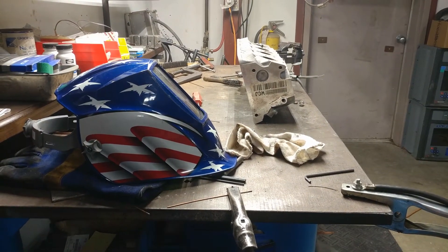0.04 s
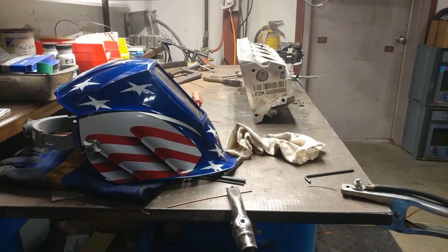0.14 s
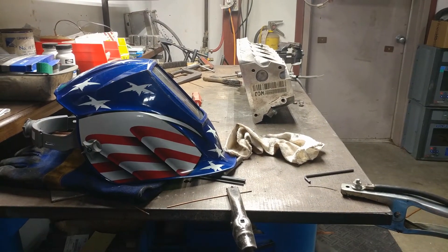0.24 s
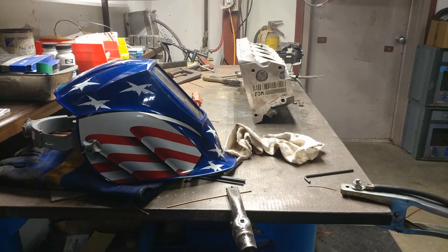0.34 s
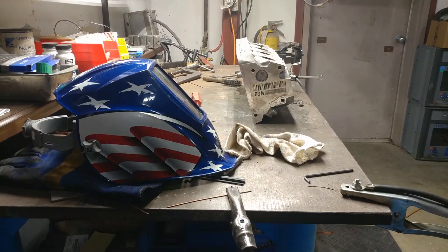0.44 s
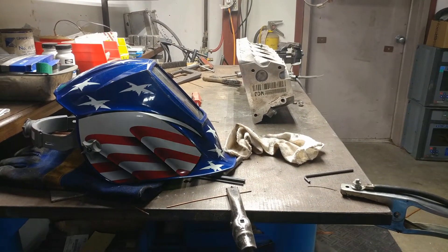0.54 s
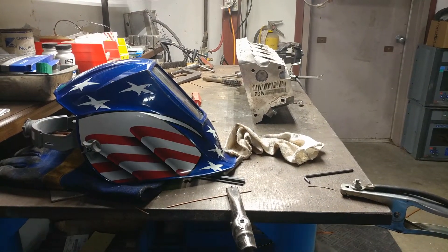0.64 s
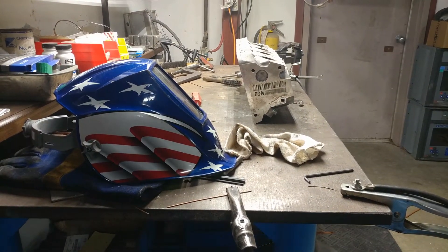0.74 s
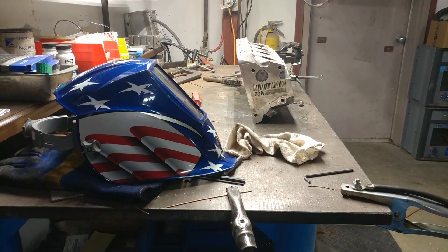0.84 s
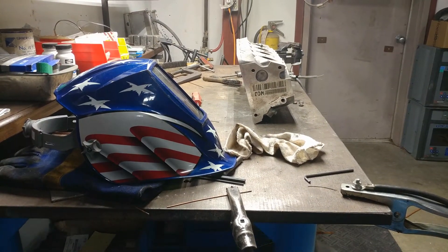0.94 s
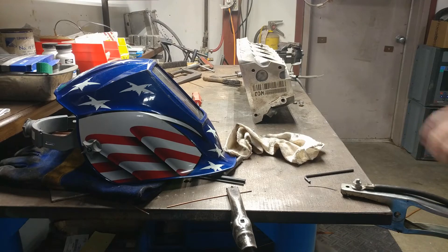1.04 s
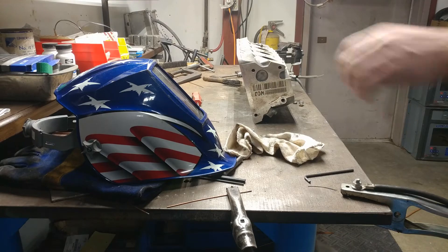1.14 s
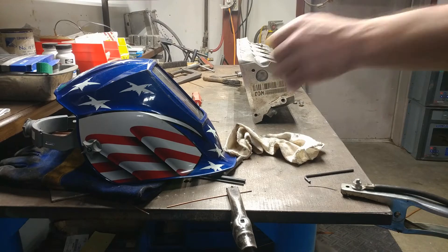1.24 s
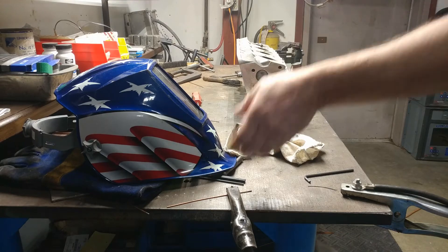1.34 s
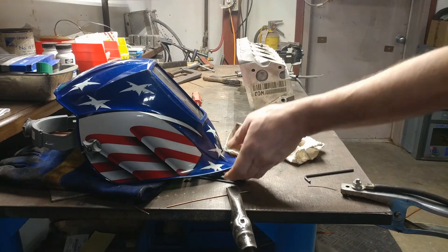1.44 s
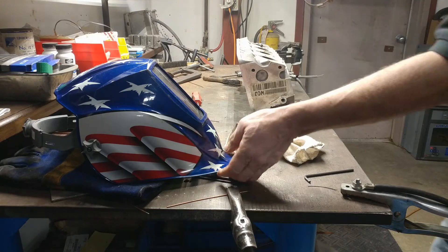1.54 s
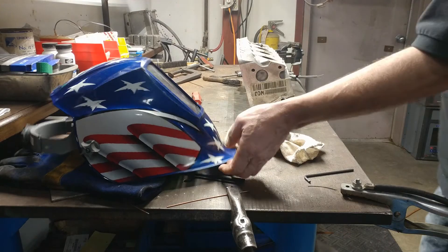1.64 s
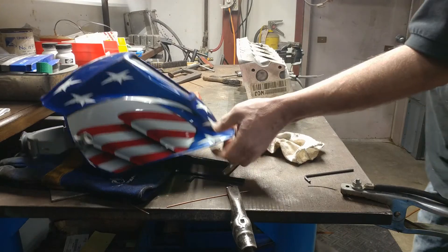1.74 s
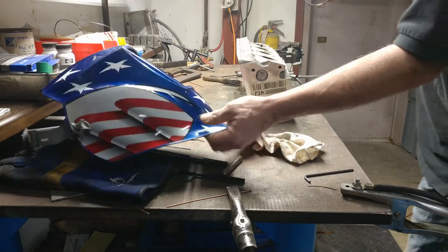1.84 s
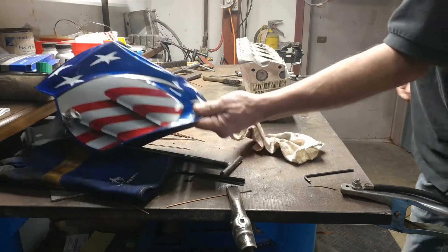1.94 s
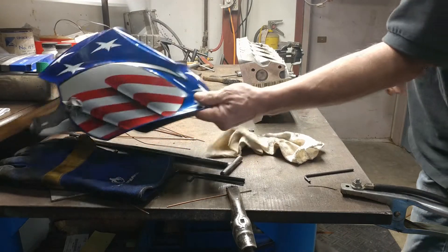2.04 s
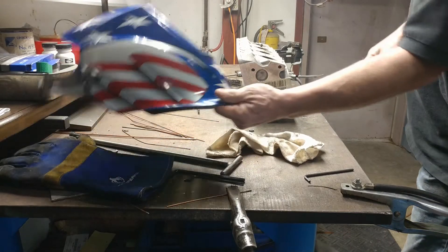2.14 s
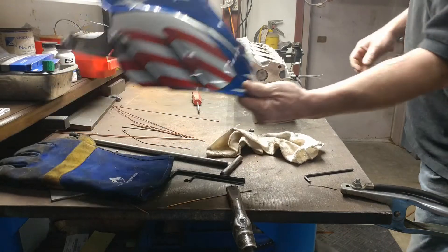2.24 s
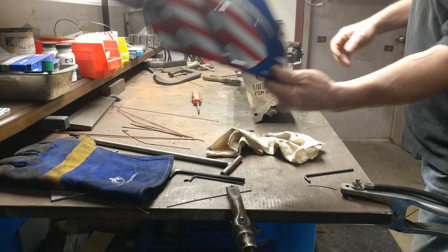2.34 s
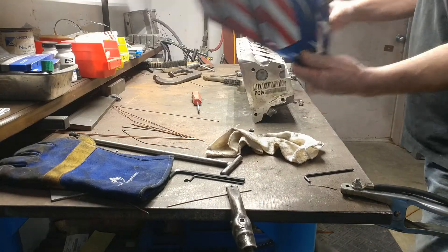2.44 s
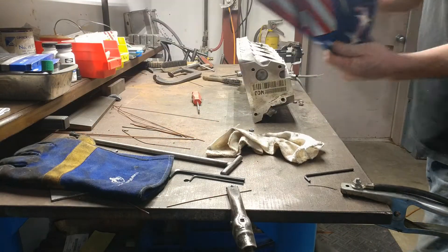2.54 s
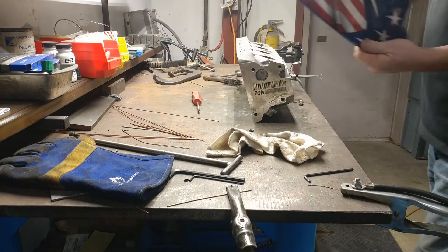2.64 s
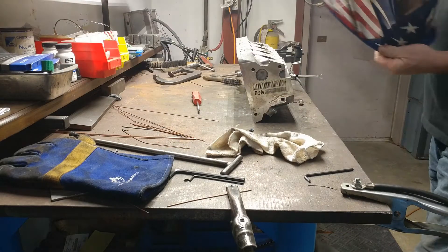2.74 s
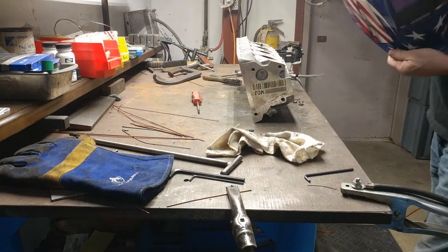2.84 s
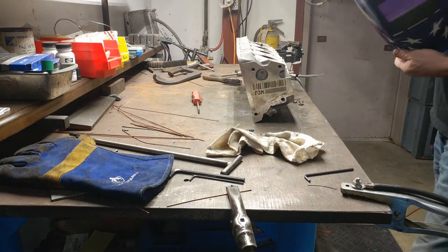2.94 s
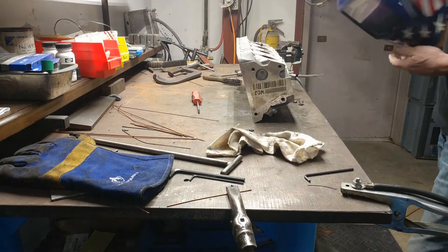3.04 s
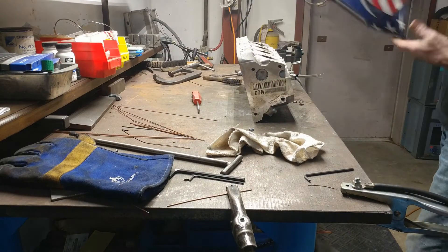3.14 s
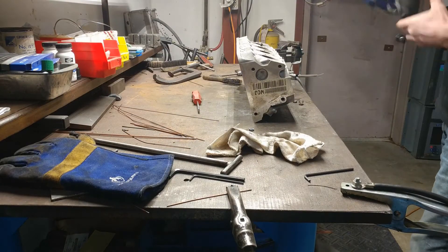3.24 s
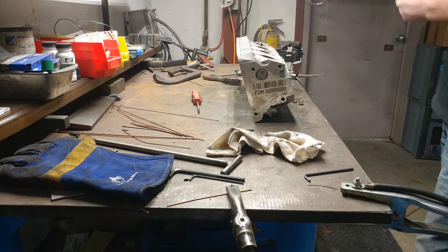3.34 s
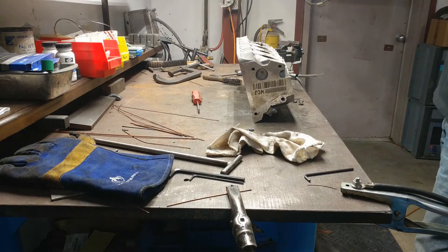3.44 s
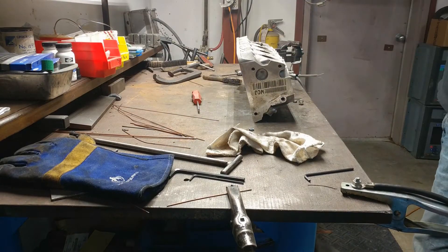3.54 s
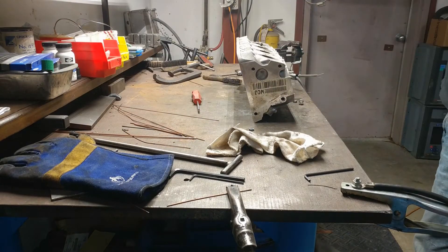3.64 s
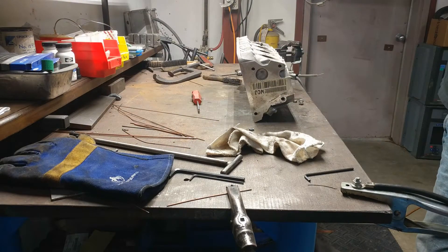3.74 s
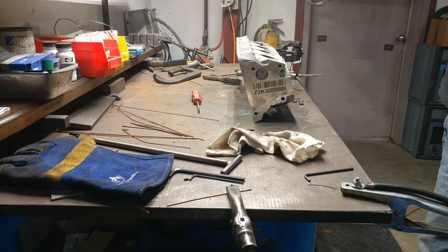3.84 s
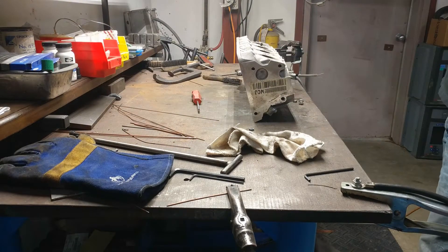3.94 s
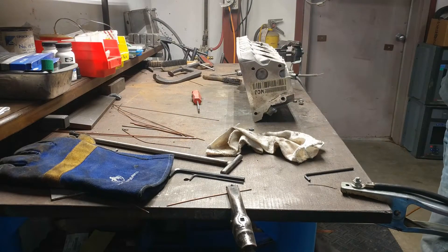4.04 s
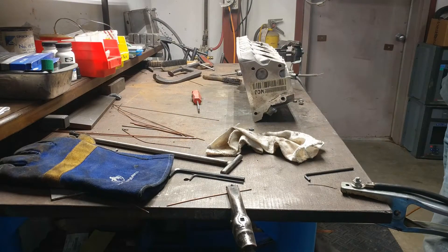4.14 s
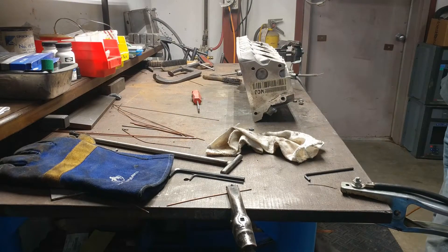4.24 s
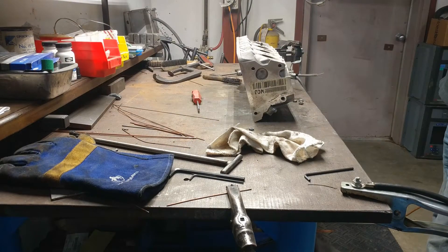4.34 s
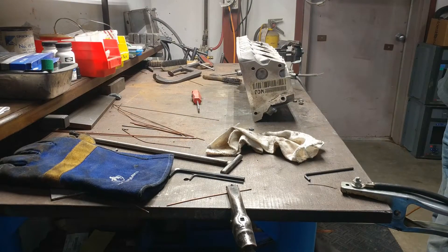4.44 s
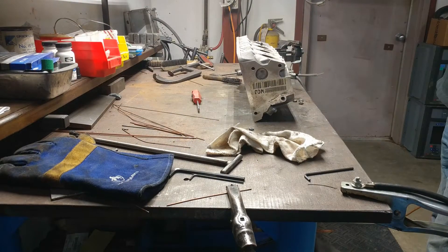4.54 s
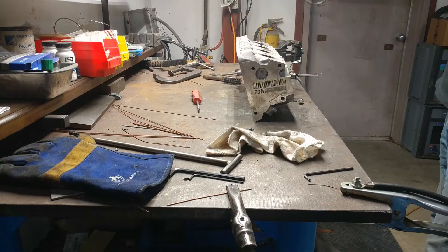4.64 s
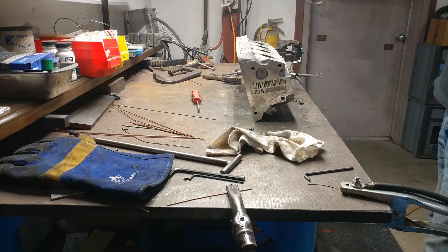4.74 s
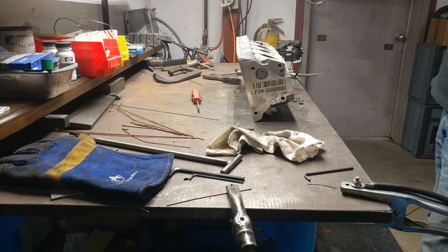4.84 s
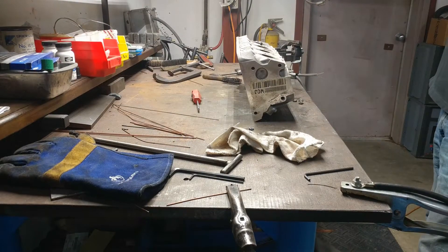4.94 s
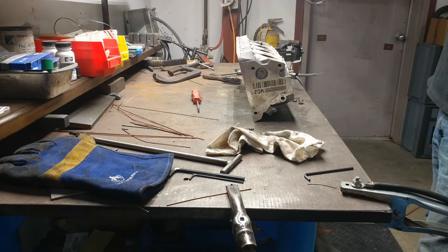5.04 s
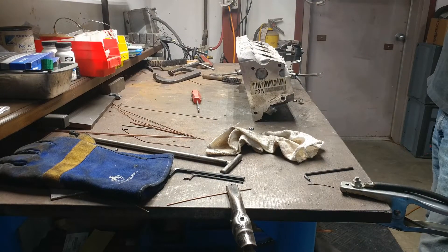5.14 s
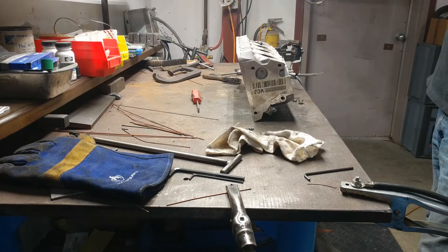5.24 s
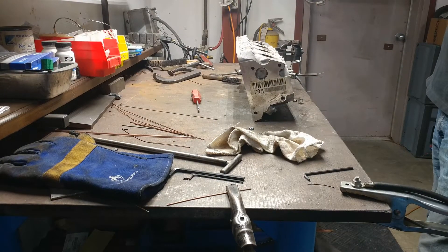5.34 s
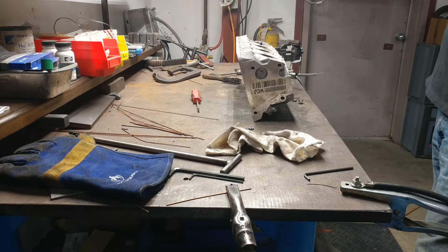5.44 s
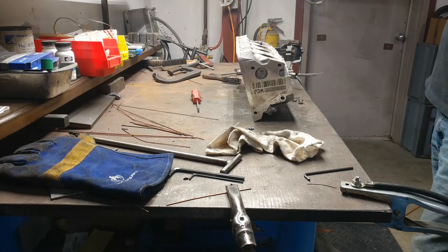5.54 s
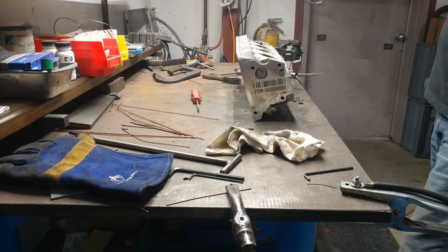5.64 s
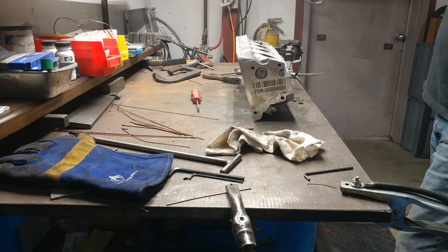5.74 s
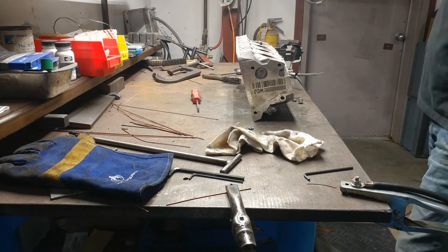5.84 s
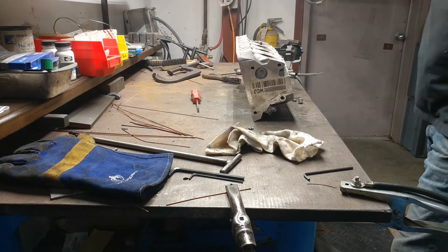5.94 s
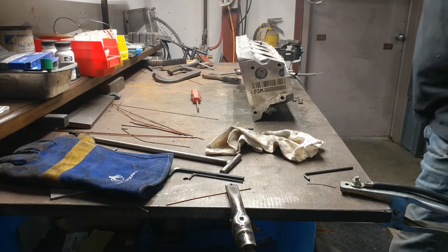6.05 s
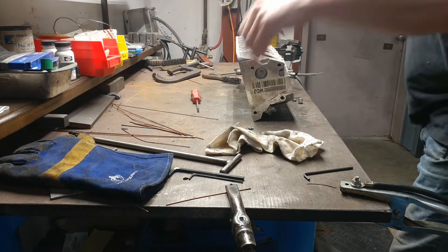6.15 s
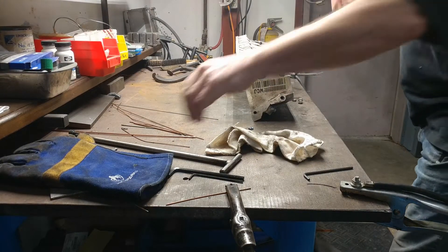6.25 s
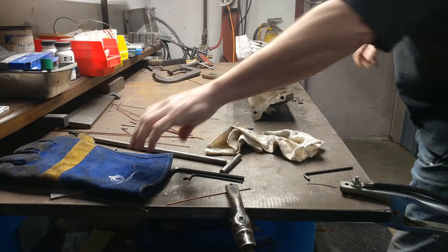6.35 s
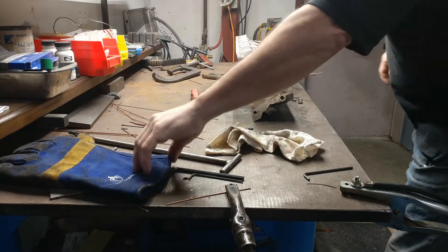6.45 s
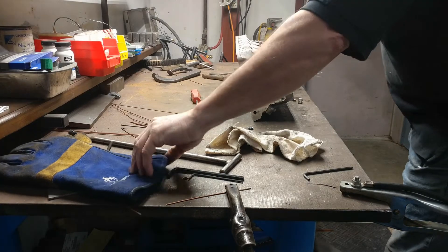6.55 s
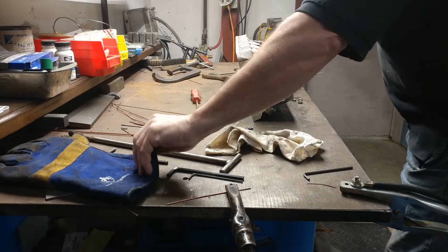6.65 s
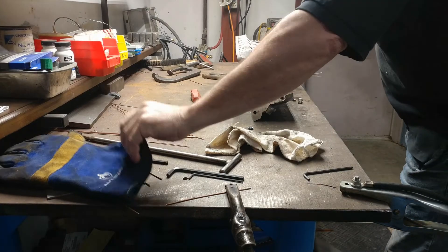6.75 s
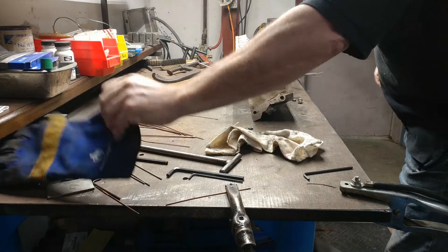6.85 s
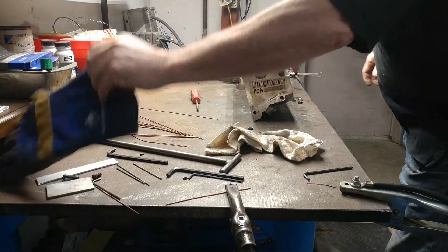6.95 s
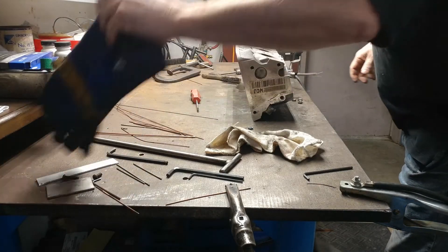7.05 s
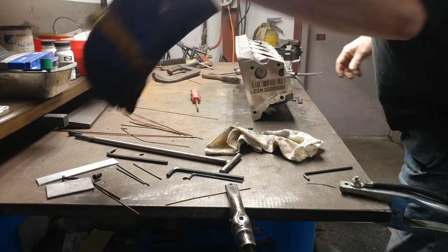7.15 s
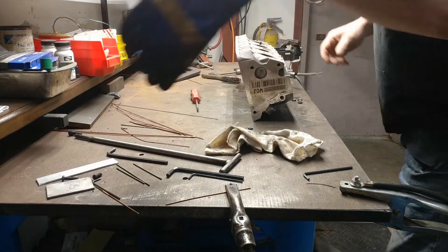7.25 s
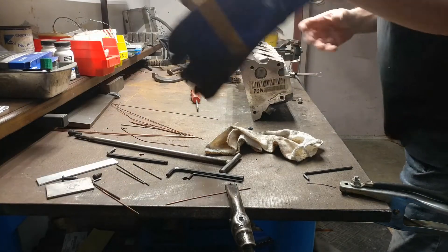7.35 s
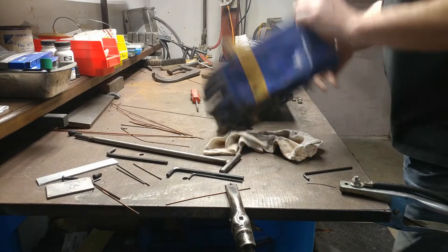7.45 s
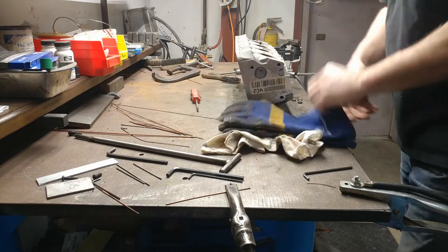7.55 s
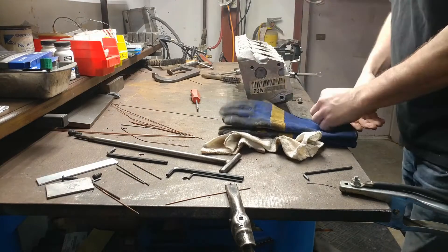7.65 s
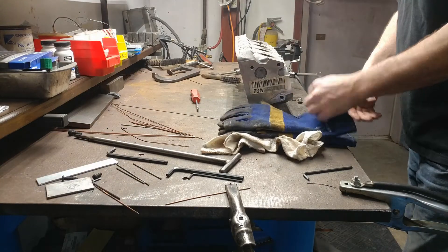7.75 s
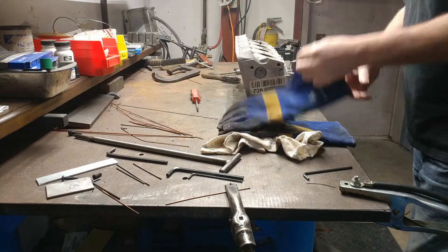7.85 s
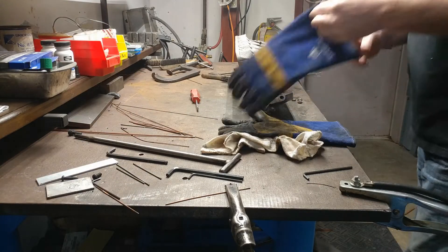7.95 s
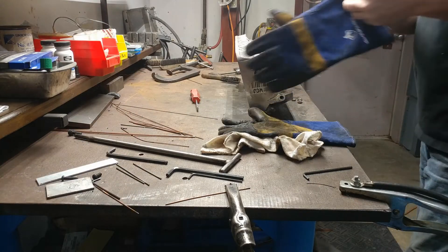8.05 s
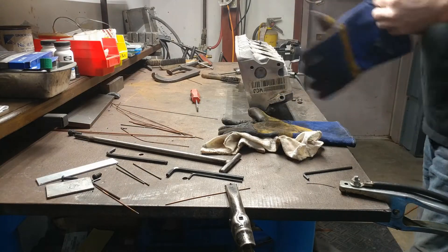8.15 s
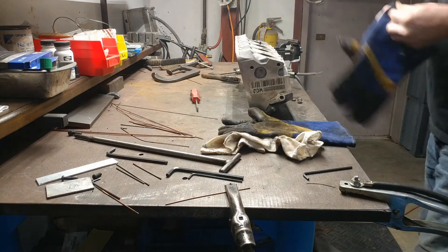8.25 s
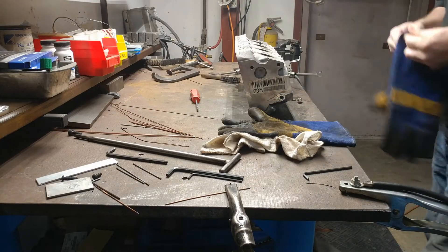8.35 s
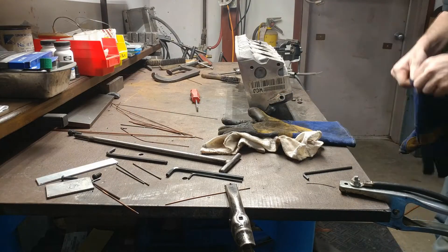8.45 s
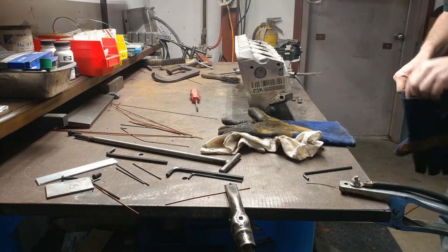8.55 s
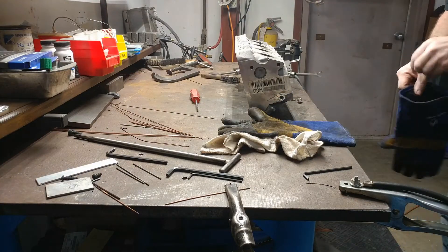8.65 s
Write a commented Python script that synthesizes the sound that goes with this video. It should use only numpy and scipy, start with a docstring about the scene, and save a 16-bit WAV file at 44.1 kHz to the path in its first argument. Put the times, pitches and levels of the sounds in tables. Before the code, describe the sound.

A hollow plastic welding helmet is lifted and knocked about in a small humming workshop, then leather gloves scrape over steel tools and slap down.

```python
"""A plastic welding helmet is lifted off a steel bench, handled and put on in a quiet workshop: bursts of
contacts excite its hollow, shell and rim, and its straps rub as uneven noise. Leather gloves slap the bench
and drag over steel tools, which ring as decaying sines and sing under the leather. Sleeves swish as
coloured hiss, a mains transformer hums over rumble and air, and a small camera's electronics chirp faintly
in the far treble."""
import sys
import numpy as np
from scipy import signal
from scipy.fft import rfft, irfft, next_fast_len
from scipy.io import wavfile
from scipy.ndimage import uniform_filter1d, map_coordinates

SR = 44100
rng = np.random.default_rng(int(sys.argv[2]) if len(sys.argv) > 2 else 0)


def wrap_up_sound(samples):
    """Save the sound to the file named by the first command line argument, as 16-bit audio."""
    columns = np.atleast_2d(samples).T
    # keep every value between -1 and 1, then stretch to whole-number steps
    tamed = np.clip(columns, -1, 1)
    steps = np.round(tamed * 32767).astype(np.int16)
    wavfile.write(sys.argv[1], SR, steps)


N = 384195


def amp(db):
    """Decibels to gain."""
    return 10 ** (np.asarray(db) / 20)


def unit(x):
    """Scale to an rms of 1."""
    return x / np.sqrt(np.mean(x ** 2) + 1e-20)


def along(points, hz):
    """Read a curve of (pitch_hz, value) points on a log pitch axis."""
    f, v = np.transpose(points)
    return np.interp(np.log(hz + 1), np.log(f + 1), v)


def curves(rows):
    """Draw one automation curve for each column after the time."""
    s, *columns = np.transpose(rows)
    return [np.interp(np.arange(N) / SR, s, column) for column in columns]


def wobble(rate):
    """A smooth random curve with `rate` knots a second."""
    knots = rng.standard_normal(int(N * rate / SR) + 4)
    return map_coordinates(knots, [np.arange(N) * rate / SR])


def filtered(x, response):
    """Shape x by a complex response of frequency."""
    m = next_fast_len(N + SR // 2)
    return irfft(rfft(x, m) * response(np.fft.rfftfreq(m, 1 / SR)), m)[..., :N]


def hiss(spectrum):
    """Coloured noise with an rms of 1."""
    return unit(filtered(rng.standard_normal(N), lambda hz: amp(along(spectrum, hz))))


def bandpass(f, centre_hz, width_hz):
    """One resonance with a gain of 1 at its centre."""
    return 1j * f * width_hz / (centre_hz ** 2 - f ** 2 + 1j * f * width_hz)


def body(f, modes, softness, favoured_hz=None, fall_db=0):
    """Resonances fade by fall_db an octave away from favoured_hz; a softer contact rolls off the treble."""
    response = 0
    for k, (pitch_hz, width_hz, level_db) in enumerate(modes):
        lean_db = fall_db * abs(np.log2(pitch_hz / favoured_hz)) if favoured_hz else 0
        response = response + (-1) ** k * amp(level_db - lean_db) * bandpass(f, pitch_hz, width_hz)
    response = response * 1j * f / (modes[0][0] + 1j * f)  # thin out below the first mode
    response = response / (1 + 1j * f / min(modes[-1][0], 4000)) ** softness  # from the last mode or 4 kHz
    return response / np.sqrt(np.mean(abs(response) ** 2))


def through(x, modes, softness):
    """Play x through resonances; white noise keeps its power."""
    return filtered(x, lambda f: body(f, modes, softness))


STROKE_DROP_DB = 20  # how far a stroke is under its peak one rise or fall away


def strokes(table):
    """Strokes swell, hold and fade in dB; their powers add, in the body and in the bright edge."""
    t, power = np.arange(N) / SR, np.zeros((2, N))
    for full_s, rise_s, hold_s, fall_s, level_db, bright_db in table:
        end_s = full_s + hold_s
        span = slice(max(int((full_s - 3 * rise_s) * SR), 0), int((end_s + 3 * fall_s) * SR))
        away = np.maximum((full_s - t[span]) / rise_s, (t[span] - end_s) / fall_s)
        stroke_db = level_db - STROKE_DROP_DB * np.maximum(away, 0)
        power[:, span] += amp(2 * (stroke_db + np.array([[0], [bright_db]])))
    return np.sqrt(power)


def friction(table, low, mid, high, grit_db, low_db, pad, softness):
    """Uneven stick-slip noise under the strokes shakes the low, mid and high resonances."""
    level, bright = strokes(table)
    grit = amp(grit_db * wobble(90) + grit_db * wobble(400))
    dull, middle, edge = [unit(grit * rng.standard_normal(N)) for _ in range(3)]
    rub = amp(low_db) * through(dull, low, 1.4) + through(middle, mid, pad)
    return level * rub + bright * through(edge, high, softness)


def contacts(t, t60, shape, onset_s, rattle_db, spike, edge):
    """The force of one blow on thud, knock and crack: a sharp push, then a scatter of contacts that dies."""
    crack_fade_db = 11  # extra loss of the crack over one t60
    size = len(t)
    force = rng.standard_normal((3, size)) * amp(3.74 * rng.standard_normal(size))  # contacts differ in size
    clumps = unit(uniform_filter1d(rng.standard_normal(size), size=110))
    force *= unit(amp(rattle_db * np.tanh(t / 0.018) * clumps))
    force *= amp(-60 * (t / t60) ** shape) * (1 - np.exp(-t / onset_s))
    force[2] *= amp(-crack_fade_db * t / t60)
    force[:, 0] = spike, spike, spike * edge
    return force


# thin-wall modes that colour the crack: pitch_hz
THIN_WALL_HZ = [2030, 2330, 2920, 3110, 3800, 4500, 4650]
THIN_WALL_Q = 28  # pitch over width


def crack_colour(f, thin, crack_hz):
    """Thin-wall modes answer at random strengths, over a broad peak at each crack pitch."""
    flex = 1
    for c in THIN_WALL_HZ:
        flex = flex + thin * rng.uniform(0, 2) * bandpass(f, c, c / THIN_WALL_Q)
    for c in crack_hz:
        flex = flex * (0.48 + 1.6 * bandpass(f, c, c / 3.74))
    return flex


def blows(table, low, mid, high, spike, pad, dull, shape, fall_db, thin, edge, onset_s, rattle_db, layers):
    """Each blow drives thud, knock and crack; where it lands decides which mid modes answer."""
    size = 8192
    out, t, f = np.zeros(N + size), np.arange(size) / SR, np.fft.rfftfreq(size, 1 / SR)
    for start_s, level_db, thud_db, crack_db, t60, mid_hz, *crack_hz in table:
        force = contacts(t, t60, shape, onset_s, rattle_db, spike, edge)
        softness = dull - 0.059 * min(crack_db, -8)  # a blow with a weak crack is also a dull one
        thud_body = amp(thud_db) * body(f, low, 2.25)
        knock_body = body(f, mid, pad, mid_hz, fall_db) ** layers
        crack_body = amp(crack_db) * crack_colour(f, thin, crack_hz) * body(f, high, softness)
        thud, knock, crack = irfft(rfft(force) * [thud_body, knock_body, crack_body])
        out[round(start_s * SR):][:size] += amp(level_db) * (thud + knock + crack) / abs(knock).max()
    return out[:N]


# hum and rumble levels: time_s, hum_db, rumble_db
BED_LEVELS = [(0, -40, -45.5), (.95, -41.5, -47), (1.55, -38, -46.5), (1.9, -37.5, -45), (2.6, -38.5, -48),
              (4.2, -41, -52), (5.15, -39, -51), (5.45, -41.5, -52), (6.2, -42, -53), (6.7, -39.5, -49),
              (7.4, -40.5, -51.5), (8.71, -41, -46)]
# hum overtones: multiple, level_db (re hum)
HUM_OVERTONES = [(2, -20), (3, -19), (4, -22), (5, -29)]
# spectrum of the building's rumble: pitch_hz, density_db (per Hz, relative)
RUMBLE_SPECTRUM = [(15, -5), (28, 7), (60, -4), (110, 0), (200, -17.5), (300, -46.5)]
# spectrum of the room air: pitch_hz, density_db (per Hz, relative)
AIR_SPECTRUM = [(70, -13), (130, -10.5), (240, -14.5), (330, -24.5), (600, -26), (1140, -30.5),
                (1600, -36.5), (2900, -40.5), (6000, -44.5), (9000, -53.5), (15800, -48)]
HUM_HZ = 119.6  # twice the mains frequency


def background():
    """Transformer hum with wavering overtones as sines, building rumble and room air as coloured noise."""
    hum_db, rumble_db = curves(BED_LEVELS)
    phase = 2 * np.pi * HUM_HZ * np.arange(N) / SR
    hum = np.sin(phase + 0.56 * wobble(18.0)) * amp(0.9 * wobble(17))
    for multiple, level_db in HUM_OVERTONES:
        drift = rng.uniform(0, 2 * np.pi) + 0.7 * wobble(12)
        hum = hum + amp(level_db + 2.3 * wobble(6.2)) * np.sin(multiple * phase + drift)
    air = amp(-51) * hiss(AIR_SPECTRUM)
    return np.sqrt(2) * amp(hum_db) * hum + amp(rumble_db) * hiss(RUMBLE_SPECTRUM) + air


# tones of the long blip: pitch_hz, level_db (while on)
LONG_BLIP = [(12360, -77), (12712, -73), (13070, -69)]
# tones of the short blip: pitch_hz, level_db (while on)
SHORT_BLIP = [(12480, -74), (12800, -78), (13170, -70)]
# tones of the closing blip: pitch_hz, level_db (while on)
CLOSING_BLIP = [(14020, -73), (14670, -70)]
# steady thin tone: pitch_hz, level_db
THIN_TONE = [(5512, -78)]


def electronics():
    """About 30 uneven cycles a second gate sines: a long blip, a short one and a higher closing one."""
    t = np.arange(N) / SR
    starts = np.cumsum(0.026 + rng.gamma(2, .004, size=400))
    since = t - np.append(-1, starts)[np.searchsorted(starts, t)]
    waver = 0.4 * wobble(45)

    def gate(on_s, off_s):
        """Open for part of each cycle, with softened edges."""
        return uniform_filter1d(((since > on_s) & (since < off_s)) * 1., size=70)

    def tones(lines):
        """Sines that waver in phase together."""
        return sum(amp(level_db) * np.sin(2 * np.pi * hz * t + waver) for hz, level_db in lines)

    blips = gate(0, .011) * tones(LONG_BLIP) + gate(.0135, .018) * tones(SHORT_BLIP)
    return blips + gate(.0185, .026) * tones(CLOSING_BLIP) + tones(THIN_TONE)


# decay of the workshop: pitch_hz, t60_s
ROOM_DECAY = [(150, 0.31), (1000, 0.1), (8000, 0.14)]


def shop(x):
    """The room answers as a noise tail in which each frequency dies at its own speed."""
    hz, t, grains = signal.stft(rng.standard_normal(SR // 2), SR, nperseg=256)
    decay = amp(-60 * t / along(ROOM_DECAY, hz)[:, None])
    tail = signal.istft(grains * decay, SR, nperseg=256)[1]
    delayed = np.pad(x, (300, 0))  # samples before the room answers
    return signal.fftconvolve(delayed, tail / np.linalg.norm(tail))[:N]


# colour of the camera housing: pitch_hz, width_hz, gain (added)
PORT_DIP, PORT_PEAK = (5590, 200, -0.37), (6440, 180, 0.45)


def housing(x):
    """Sound from the room reaches the microphone through a small port with a dip and a peak."""
    return filtered(x, lambda f: 1 + sum(g * bandpass(f, c, w) for c, w, g in (PORT_DIP, PORT_PEAK)))


# sleeve strokes: full_from_s, rise_s, hold_s, fall_s, level_db, brightness_db (re level)
SLEEVE_STROKES = [(.82, 0.13, 0.061, 0.16, -62, -15), (3.58, 0.11, 0.078, .2, -66, -5),
                  (3.73, .05, 0.018, 0.07, -58.5, -2), (5.15, 0.014, .08, .1, -54.5, -5),
                  (5.25, .05, 0.033, 0.068, -52.5, -4), (5.56, 0.23, 0.13, 0.082, -56.5, -3),
                  (5.84, 0.28, 0.17, 0.1, -54, -2), (6.07, .05, 0.04, 0.24, -55, -4),
                  (6.2, 0.093, 0.099, 0.031, -51.5, -9), (7.03, 0.036, 0.042, 0.023, -53.5, -20),
                  (7.48, 0.13, .02, .2, -60.5, -5.5), (7.63, 0.07, 0.1, 0.18, -51.5, 2.5)]
# body of the fabric hiss: pitch_hz, density_db (per Hz, relative)
CLOTH_SPECTRUM = [(1200, -9), (2500, -4.5), (5000, -2), (9000, -0.5), (12000, -0.5), (15800, -7)]
# bright edge of the fabric hiss: pitch_hz, density_db (per Hz, relative)
FINE_SPECTRUM = [(7000, -49), (10500, -17), (13000, -9), (15800, -8)]


def sleeves():
    """Swishing fabric is nearly smooth hiss with a few fibres catching."""
    level, fine = strokes(SLEEVE_STROKES)
    fibres = amp(1.5 * wobble(30) + 1.5 * wobble(500))
    return unit(fibres) * (level * hiss(CLOTH_SPECTRUM) + fine * hiss(FINE_SPECTRUM))


def steel(hits, pitches, modes, rattle, shape):
    """Each contact rings the modes at new strengths; chatter on the bench roughens and chokes the ring."""
    out, t = np.zeros(N + SR), np.arange(SR // 2) / SR
    for start_s, hit_db, stretch in hits:
        chatter = amp(1.4 * unit(uniform_filter1d(rng.standard_normal(len(t)), size=200)))
        ring = 0
        for hz, (level_db, t60) in zip(pitches, modes):
            fade_db = -60 * (t / (t60 * stretch)) ** shape  # a shape over 1 chokes it more and more
            ring = ring + amp(level_db + rng.normal(0, 1.4) + fade_db) * np.sin(2 * np.pi * hz * t)
        tick_fade = amp(-60 * t / 0.0039) + 0.27 * amp(-60 * t / 0.205)
        tick = rattle * tick_fade * np.diff(rng.standard_normal(len(t) + 1))
        hit = chatter * ring * (1 - np.exp(-t / 0.0049)) + tick
        out[round(start_s * SR):][:len(t)] += amp(hit_db) * hit
    return out[:N]


# nudges of the rod: start_s, level_db, stretch (factor on t60)
ROD_NUDGES = [(6.699, -12.5, 0.96)]
# modes of the rod: pitch_hz
ROD_PITCHES = [3216, 5841, 6584, 7585, 8330, 11946]
# strengths of the rod's modes: level_db, t60_s
ROD_MODES = [(-25, 0.1), (-23, 0.15), (-29, 0.1), (-22, 0.075), (-29, 0.15), (-11, 0.17)]
# nudges of the key: start_s, level_db, stretch (factor on t60)
KEY_NUDGES = [(6.678, -40, .4), (6.70, -37, 1.05), (7.098, -54, 0.4)]
# modes of the key: pitch_hz
KEY_PITCHES = [4900, 6450, 8560]
# strengths of the key's modes: level_db, t60_s
KEY_MODES = [(-5, 0.13), (-18, 0.1), (-18, 0.055)]
# nudges of the bar: start_s, level_db, stretch (factor on t60)
BAR_NUDGES = [(6.654, -25, 0.49), (6.703, -38, 1), (6.848, -37.5, 0.48), (6.897, -54, .3)]
# modes of the bar: pitch_hz
BAR_PITCHES = [2790, 2843]
# strengths of the bar's modes: level_db, t60_s
BAR_MODES = [(-19, 0.038), (4.5, 0.095)]


def tools():
    """Nudged steel rod, key and bar ring as decaying sines with a noisy tick."""
    rod = steel(ROD_NUDGES, ROD_PITCHES, ROD_MODES, rattle=.15, shape=1.4)
    key = steel(KEY_NUDGES, KEY_PITCHES, KEY_MODES, rattle=.06, shape=3)
    bar = steel(BAR_NUDGES, BAR_PITCHES, BAR_MODES, rattle=0.088, shape=1.15)
    return rod + key + bar


# gloves dragged and pulled on: full_from_s, rise_s, hold_s, fall_s, level_db, brightness_db (re level)
GLOVE_STROKES = [(6.595, 0.044, 0.077, 0.07, -39, -6.5), (6.65, 0.085, 0.03, 0.041, -35.5, -5.5),
                 (6.703, 0.0044, 0.021, 0.069, -45, 5.5), (6.78, 0.093, 0.032, 0.13, -53.5, -5.5),
                 (7.0, 0.22, 0.1, 0.15, -55, -23), (7.03, 0.039, 0.029, 0.011, -63, 11.5),
                 (7.42, 0.096, 0.037, 0.087, -58.5, -5), (7.575, 0.029, 0.065, 0.024, -31, -9),
                 (7.66, 0.017, 0.061, 0.44, -57, -22), (8.165, 0.015, 0.037, 0.18, -68, 5.5)]
# tools singing under the glove: pitch_hz, width_hz, level_db
SINGING_MODES = [(1270, 110, 7), (2870, 500, -2), (4130, 670, 0.5), (6460, 630, -3.5), (8500, 90, -6)]
LIFTED_S = 7.2  # the glove leaves the tools


def scrape():
    """The dragged glove catches on the tools in uneven jerks and sets them singing."""
    bright = strokes([row for row in GLOVE_STROKES if row[0] < LIFTED_S])[1]
    jerks = unit(amp(4.9 * wobble(60) + 3.3 * wobble(300)) * rng.standard_normal(N))
    return amp(-2.0) * bright * through(jerks, SINGING_MODES, 0.1)


# leather slapping the bench: start_s, level_db (knock peak), thud_db, crack_db (both re level), t60_s,
# favoured_hz
GLOVE_SLAPS = [(6.664, -25, 1, -20, 0.06, 700), (6.849, -37.5, 1, 2, 0.059, 800),
               (7.540, -28, -17.5, -21, 0.0098, 857), (7.554, -17, 5, -31, 0.02, 800),
               (7.575, -42, -7, -17, 0.014, 740), (7.5825, -15, -23, 7, 0.0065, 1200),
               (7.5942, 0.5, -31, -18, 0.003, 845), (7.609, -21.5, 14, -31, 0.012, 700),
               (7.634, -37, -1, -3.5, 0.036, 700), (7.76, -40, 18.5, -16, 0.011, 794)]
# low resonance of the gloves: pitch_hz, width_hz, level_db
PAD_MODES = [(357, 300, 0)]
# mid resonances of the leather: pitch_hz, width_hz, level_db
LEATHER_MODES = [(780, 510, 22), (1390, 2140, -20), (2070, 990, -27)]
# high resonance of the leather grain: pitch_hz, width_hz, level_db
GRAIN_MODES = [(4000, 8900, 0)]
# boom of the bench: pitch_hz, width_hz, level_db
BENCH_MODES = [(45, 55, 0)]


def gloves():
    """Leather slaps and drags excite pad, leather and grain, and the bench booms under them."""
    leather = blows(GLOVE_SLAPS, PAD_MODES, LEATHER_MODES, GRAIN_MODES,
                    spike=24.0, pad=2.6, dull=2.6, shape=3.4, fall_db=9, thin=0,
                    edge=0.99, onset_s=0.00053, rattle_db=-3.5, layers=1.97)
    leather = leather + friction(GLOVE_STROKES, PAD_MODES, LEATHER_MODES, GRAIN_MODES,
                                 grit_db=2.0, low_db=-5.0, pad=1.04, softness=3.9)
    return leather + amp(-40.5) * through(abs(leather), BENCH_MODES, 1.21)


# knocks of shell and headband, and footfalls: start_s, level_db (knock peak), thud_db, crack_db (both re
# level), t60_s, favoured_hz, crack_hz
HELMET_KNOCKS = [(0.676, -39.5, 12, -19, 0.11, 544, 4620), (1.161, -42, -13, -22, 0.04, 1230, 4300),
                 (1.175, -42, -1, -12, 0.052, 458, 4760), (1.374, -35, 12.5, -15.5, 0.026, 580, 2750),
                 (1.486, -38.5, 3.5, -37, 0.15, 487, 5200), (1.709, -30.5, -5, -10.5, 0.11, 930, 2180),
                 (1.758, -32.5, 1, -10, 0.13, 1110, 3800), (1.8, -27.5, -6, -13, 0.16, 1110, 4570),
                 (1.813, -24.5, -1, -11.5, 0.13, 1150, 3600), (1.825, -16, -6, -16.5, 0.073, 880, 2130),
                 (1.875, -23.5, -2, -40, 0.16, 579, 2200), (1.918, -9, -6, -44, 0.025, 490, 2200),
                 (1.924, -18, 6, -15, 0.049, 570, 2190), (1.958, -24.5, -22, -22, 0.19, 800, 4500),
                 (2.001, -23, -24, -11.5, 0.062, 1350, 4050), (2.023, -26.5, -14, -6, 0.059, 1030, 2890),
                 (2.076, -23, -5, -18, 0.035, 775, 2980), (2.083, -17.5, -6, -20, 0.14, 905, 2960),
                 (2.098, -17.5, -1.5, -4, 0.11, 1210, 2220), (2.126, -17, -9, -27, 0.16, 580, 3430),
                 (2.139, -23, 1, -1.5, 0.083, 613, 3020), (2.244, -23, -17, -10, 0.073, 905, 2440),
                 (2.324, -22, -7, -12.5, 0.085, 540, 2840), (2.482, -34, 3, -28, 0.24, 895, 3170),
                 (2.591, -27, -10, -8, 0.1, 795, 2650), (2.704, -35.5, 0.5, -19, 0.24, 770, 3430),
                 (2.891, -26, -3, -8, 0.066, 910, 2710), (2.912, -20.5, -25, -32, 0.16, 990, 4040),
                 (2.921, -14.5, -6, -1, 0.082, 1000, 3420), (2.934, -18, -0.5, -10.5, 0.095, 573, 3170),
                 (2.963, -11, -6.5, -9, 0.11, 820, 3160), (2.979, -15.5, -16, -7, 0.086, 1100, 2430),
                 (3.035, -26.5, -32, -25, 0.25, 640, 2780), (3.209, -34.5, 0, -10, 0.14, 575, 2410),
                 (3.312, -37.5, 0, -31, 0.19, 567, 2630), (3.393, -38, -21, -15.5, 0.06, 580, 2150),
                 (3.475, -30.5, -7, -34, 0.25, 511, 2200), (3.512, -36, -1, -14.5, 0.14, 503, 2390),
                 (3.715, -30.5, -9, -19.5, 0.12, 577, 2560), (3.816, -35.5, -7, -19, 0.31, 520, 2980),
                 (3.849, -34.5, -25, -10, 0.15, 519, 3200), (4.425, -21.5, -5, -6.5, 0.12, 520, 2900),
                 (4.438, -21, -5, -9, 0.13, 519, 4900), (4.472, -28.5, 5.5, -0.5, 0.14, 1180, 2280),
                 (4.536, -30.5, 2, -12.5, 0.19, 522, 4130), (4.547, -34.5, -1, -3, 0.033, 900, 3260),
                 (4.566, -24, -28, -14, 0.13, 528, 2170), (5.015, -20.5, -17, -17, 0.099, 534, 4570),
                 (5.037, -29, -11, 0.5, 0.1, 540, 2560), (5.068, -34, -2, 0, 0.13, 1250, 2850),
                 (5.129, -27, -2, -13, 0.079, 525, 2600), (5.147, -30.5, 3, -10, 0.19, 525, 3200),
                 (5.239, -35, -3, -5, 0.12, 525, 2520), (5.853, -30, 9, -23, 0.04, 506, 3750),
                 (5.888, -26, -33, -5.5, 0.038, 501, 2390), (8.556, -36.5, 5.5, -25, 0.4, 900, 2700)]
# shell and straps rubbing: full_from_s, rise_s, hold_s, fall_s, level_db, brightness_db (re level)
HELMET_STROKES = [(1.185, 0.027, 0.012, 0.048, -37.5, -11), (1.39, 0.039, 0.012, 0.2, -53, -6),
                  (1.935, 0.1, 0.027, 0.068, -40, -5), (2.49, 0.046, 0.097, 0.045, -49, -2),
                  (2.89, 0.019, 0.14, 0.075, -45, 0.5), (3.05, 0.034, 0.04, 0.045, -43.5, -19),
                  (3.2, 0.3, 0.42, 0.2, -60, -2), (4.55, 0.028, 0.071, 0.031, -41, -12),
                  (5.008, 0.0029, 0.045, 0.047, -33.5, -9.5), (5.12, 0.033, 0.036, 0.061, -41, -6),
                  (5.21, 0.035, 0.038, 0.052, -44.5, -9), (5.65, 0.11, 0.061, 0.25, -56.5, -16),
                  (5.86, 0.019, 0.017, 0.082, -39.5, -5), (8.505, 0.036, 0.024, 0.033, -50.5, -11),
                  (8.57, 0.059, 0.041, 0.039, -46.5, -3)]
# low resonances of the hollow: pitch_hz, width_hz, level_db
HOLLOW_MODES = [(219, 260, 1.5), (354, 78, 12)]
# mid resonances of the shell: pitch_hz, width_hz, level_db
SHELL_MODES = [(523, 73, 2.5), (778, 296, -1.5), (857, 190, 1.5), (1192, 180, -2.5), (1310, 118, 1.5),
               (1644, 640, -9)]
# high resonance of the rim: pitch_hz, width_hz, level_db
RIM_MODES = [(2470, 11800, -0.68)]
PLASTIC_TOP_HZ = 8440  # the plastic damps everything above


def helmet():
    """Knocks and rubbing excite hollow, shell and rim, and the plastic damps the top."""
    plastic = blows(HELMET_KNOCKS, HOLLOW_MODES, SHELL_MODES, RIM_MODES,
                    spike=8.5, pad=1.9, dull=1.0, shape=0.96, fall_db=9.0, thin=0.37,
                    edge=0.35, onset_s=0.00056, rattle_db=4.5, layers=0.99)
    plastic = plastic + friction(HELMET_STROKES, HOLLOW_MODES, SHELL_MODES, RIM_MODES,
                                 grit_db=2.0, low_db=1.0, pad=4.74, softness=2.26)
    return filtered(plastic, lambda hz: 1 / (1 + 1j * hz / PLASTIC_TOP_HZ - (hz / PLASTIC_TOP_HZ) ** 2))


def scene():
    """Handled objects excite the room and pass the port with the sleeves; hum and chirps join directly."""
    handled = helmet() + gloves() + tools() + scrape()
    through_port = housing(handled + amp(-11.5) * shop(handled) + sleeves())
    return (through_port + background() + electronics())[None]


TOP_HZ = 15780  # band limit of the camera


def record(dry):
    """The input stage rounds off the loudest peaks; the camera keeps nothing above its band limit."""
    rounded = dry / (1 + abs(dry / .97) ** 6) ** (1 / 6)
    return filtered(rounded, lambda hz: hz < TOP_HZ)


dry = scene()
out = record(dry)
wrap_up_sound(out)
```